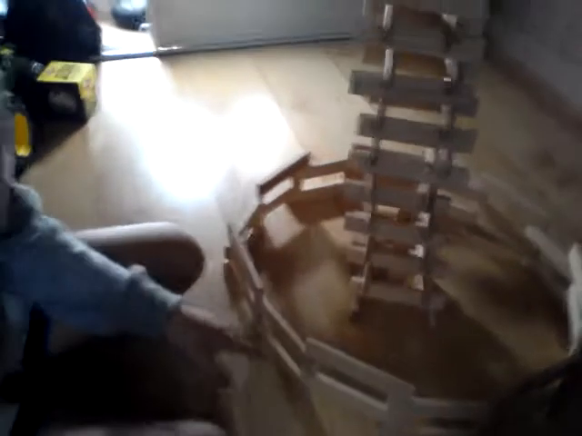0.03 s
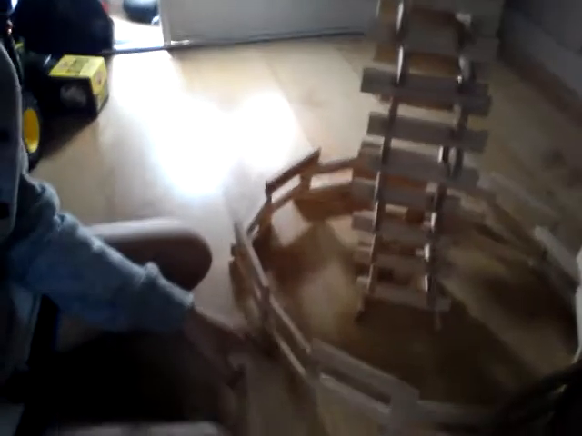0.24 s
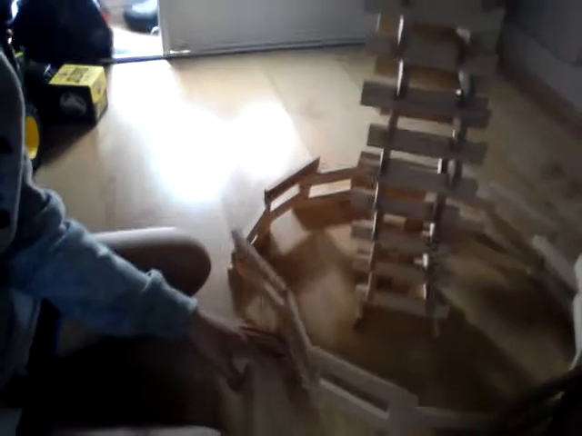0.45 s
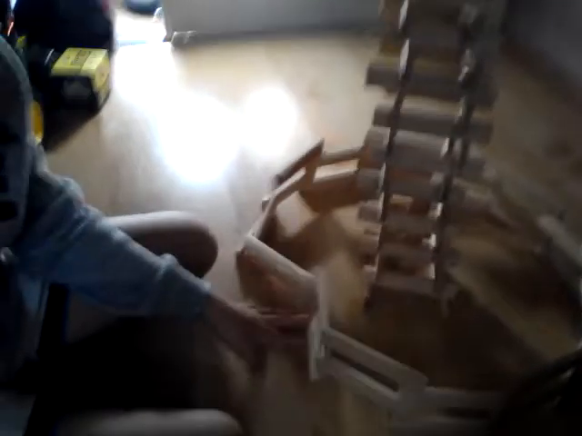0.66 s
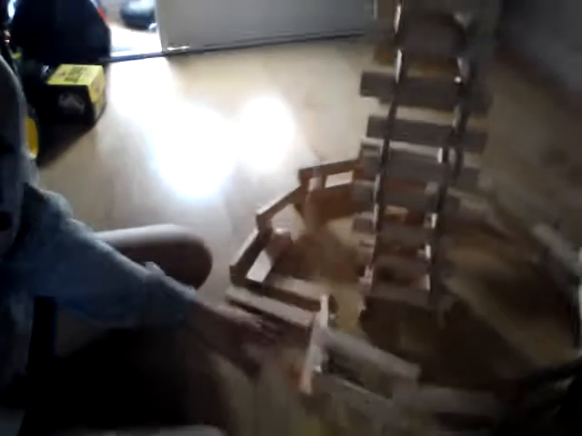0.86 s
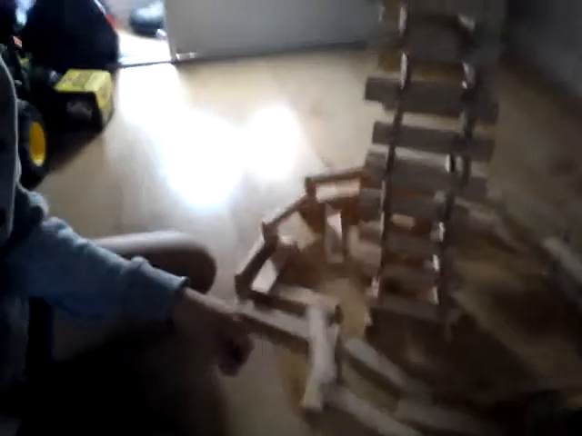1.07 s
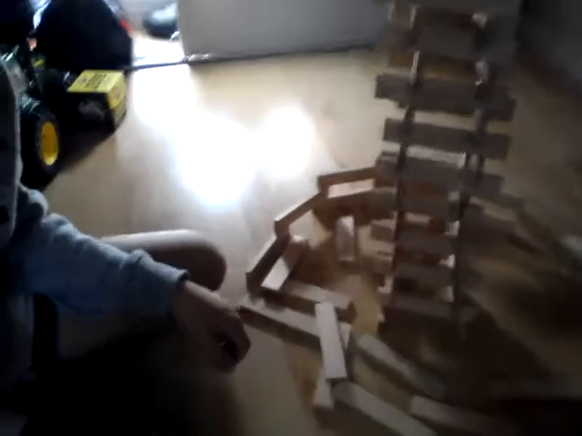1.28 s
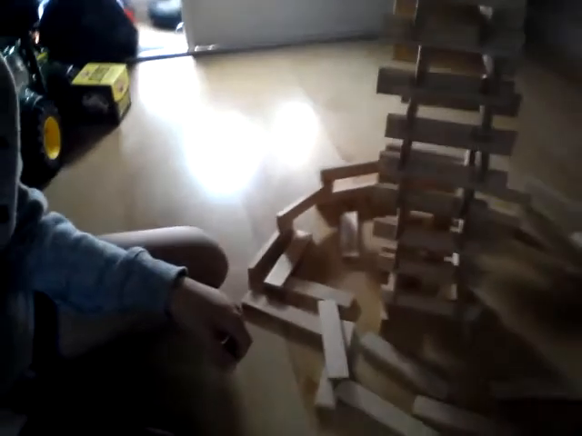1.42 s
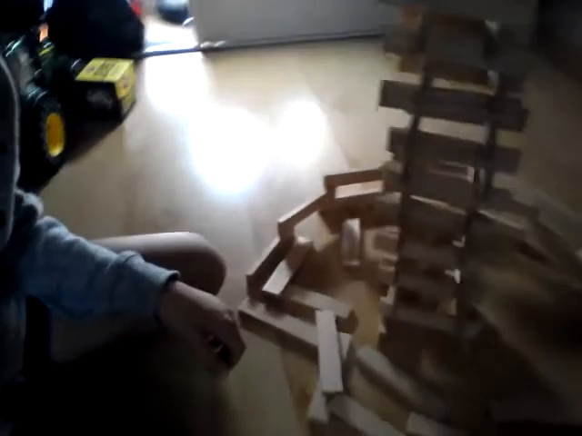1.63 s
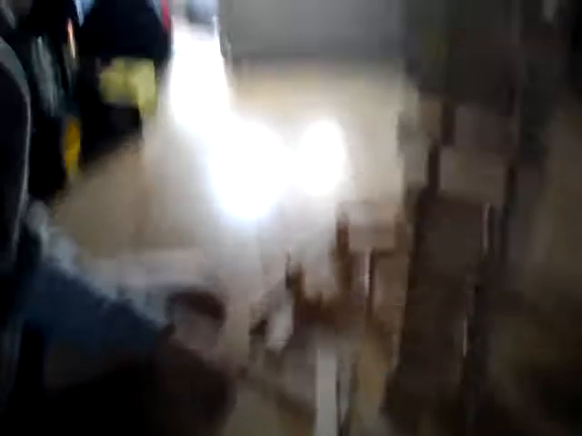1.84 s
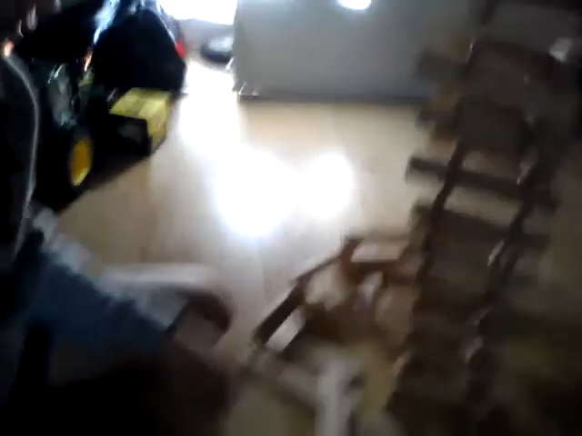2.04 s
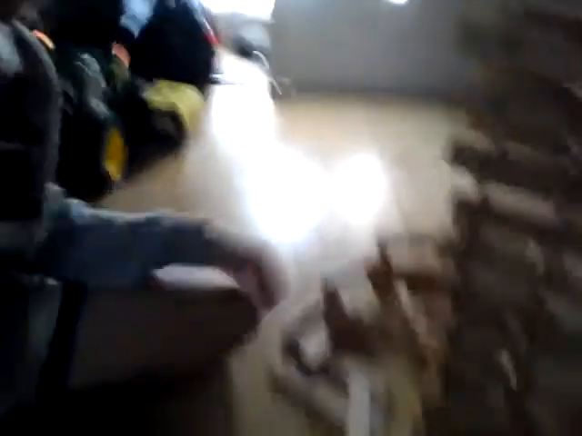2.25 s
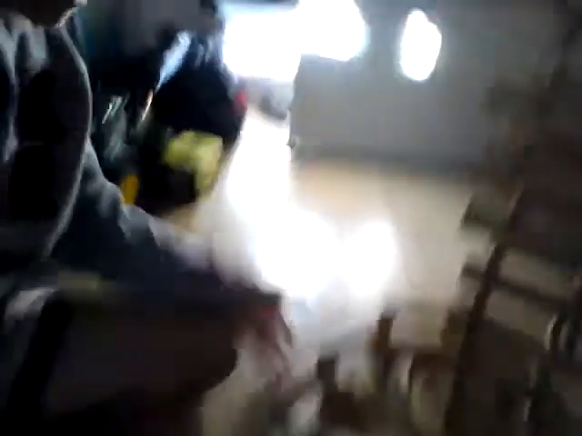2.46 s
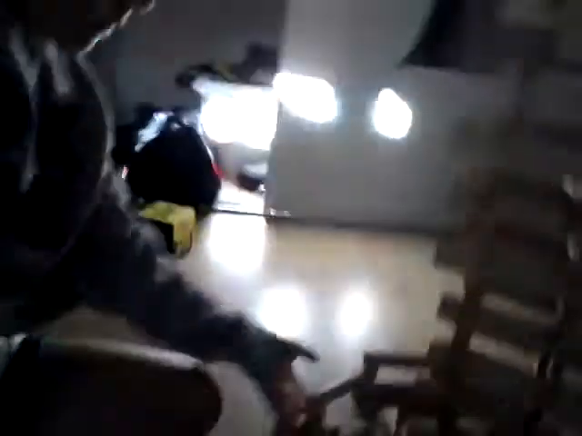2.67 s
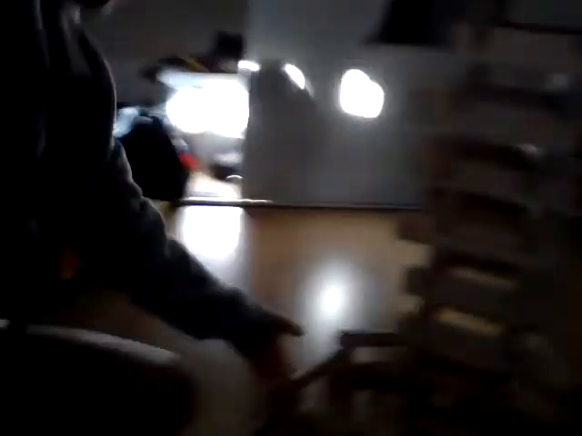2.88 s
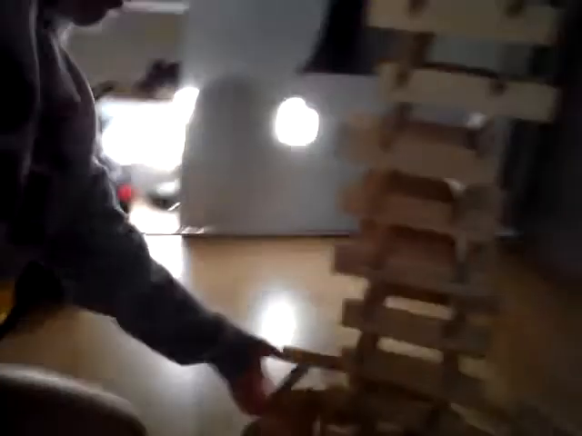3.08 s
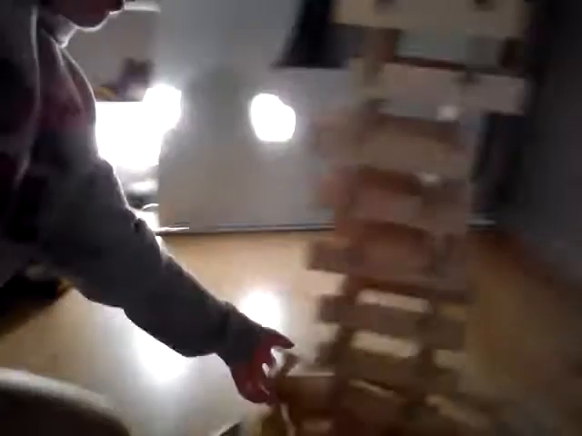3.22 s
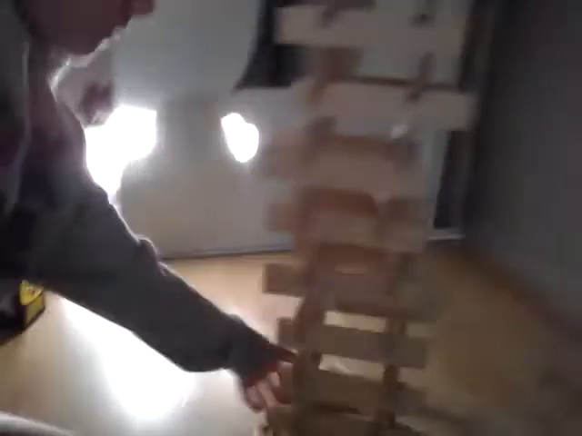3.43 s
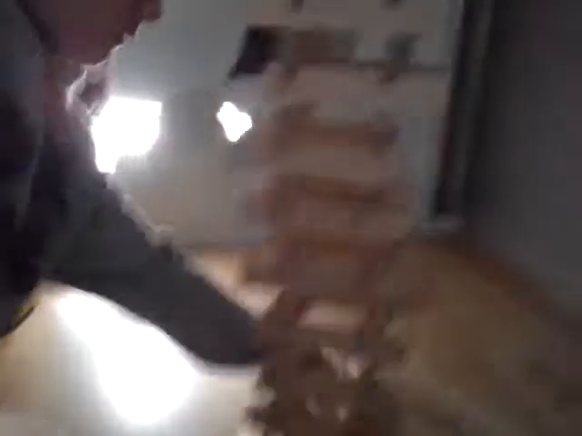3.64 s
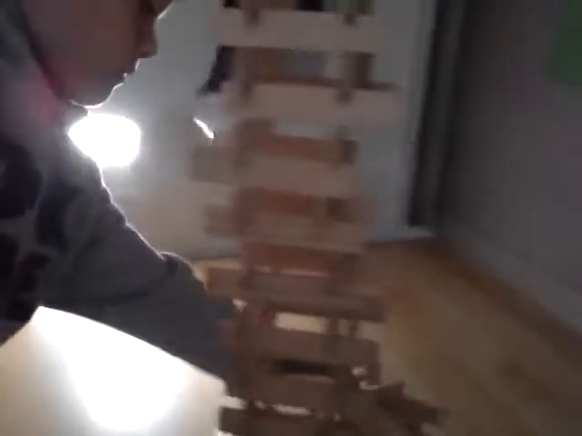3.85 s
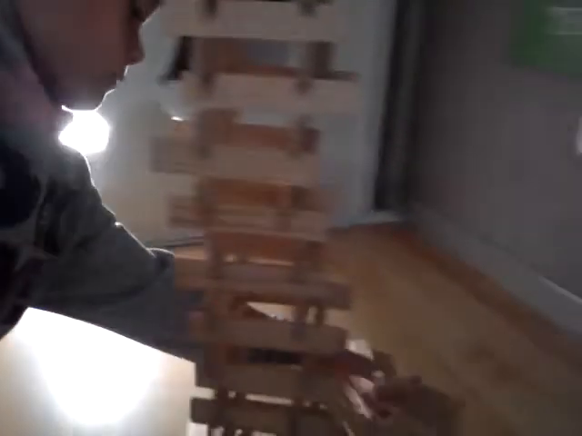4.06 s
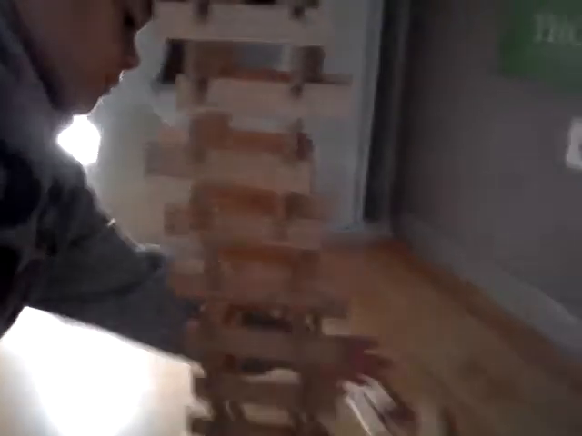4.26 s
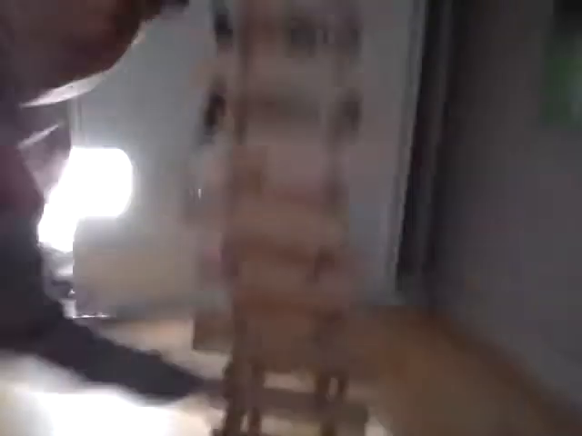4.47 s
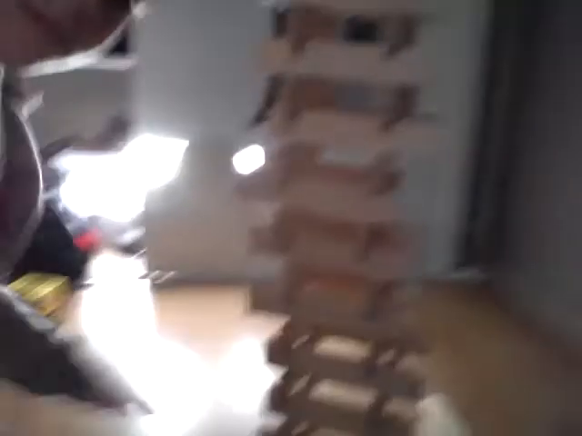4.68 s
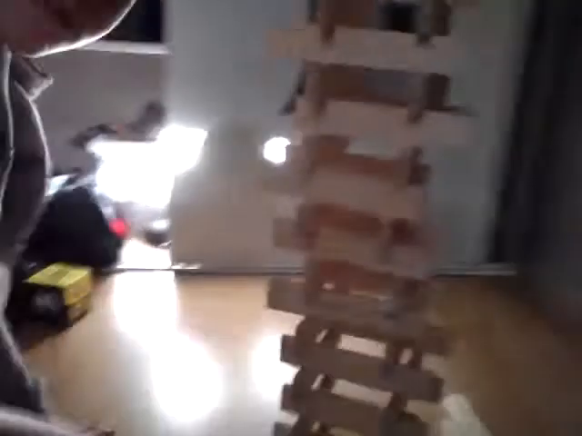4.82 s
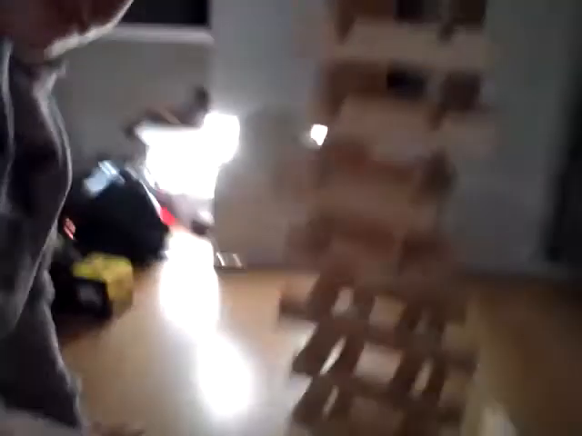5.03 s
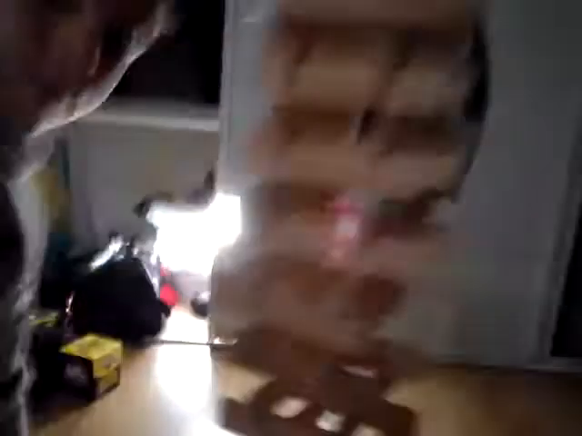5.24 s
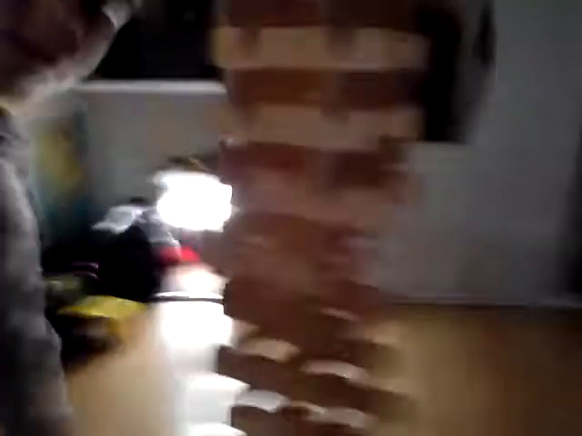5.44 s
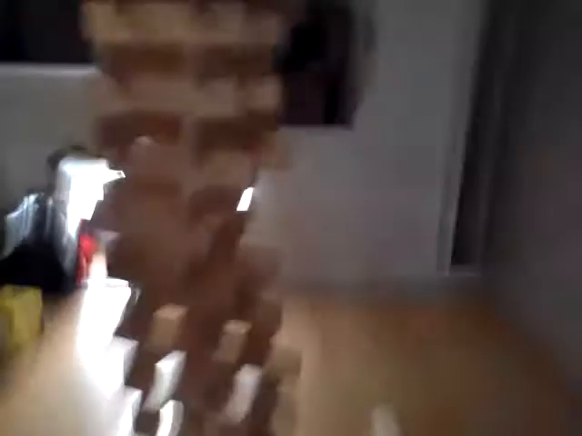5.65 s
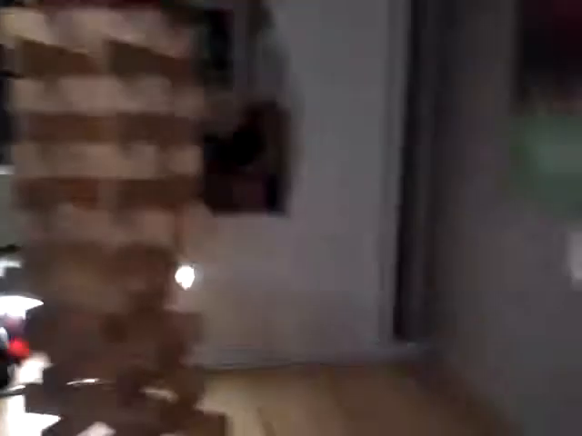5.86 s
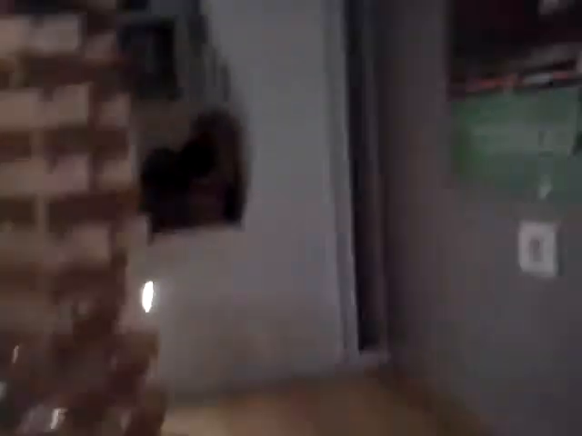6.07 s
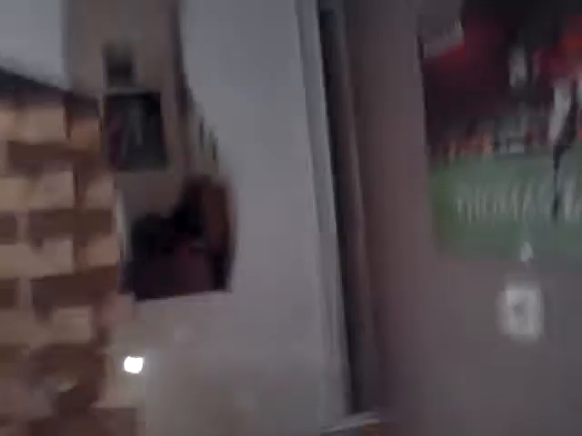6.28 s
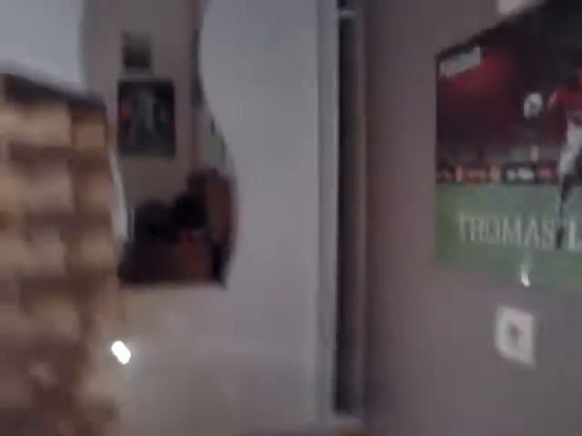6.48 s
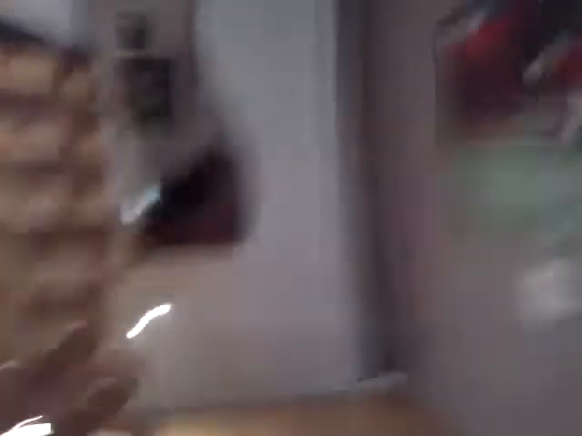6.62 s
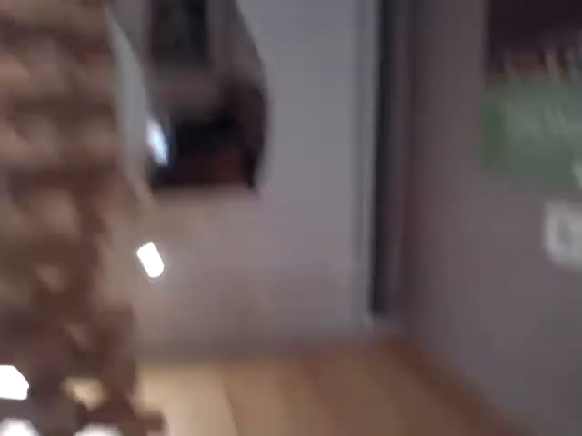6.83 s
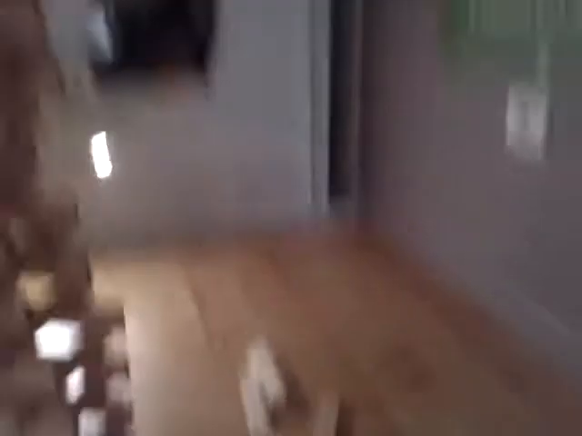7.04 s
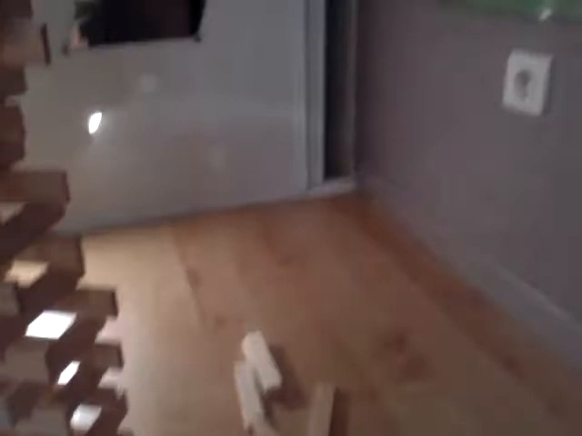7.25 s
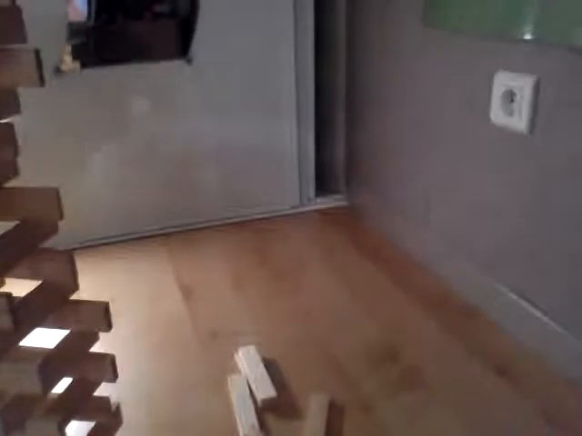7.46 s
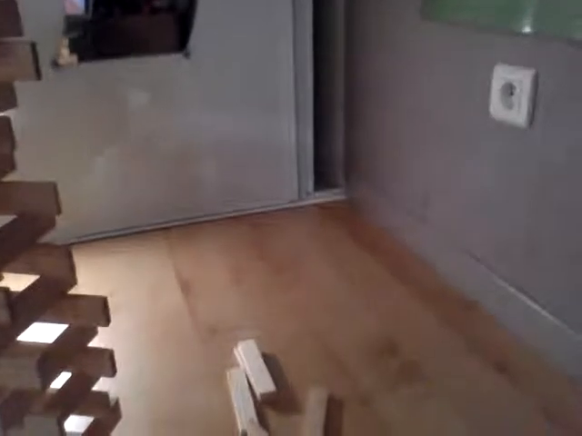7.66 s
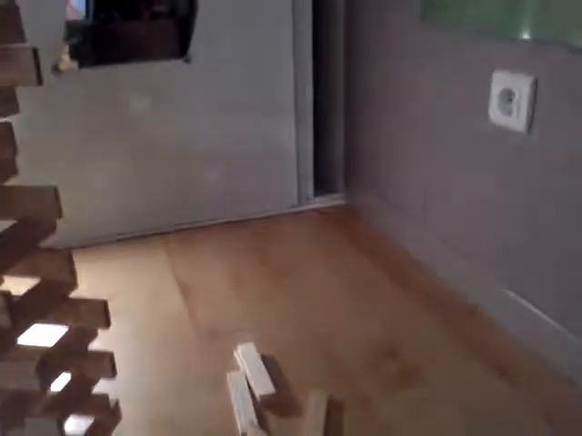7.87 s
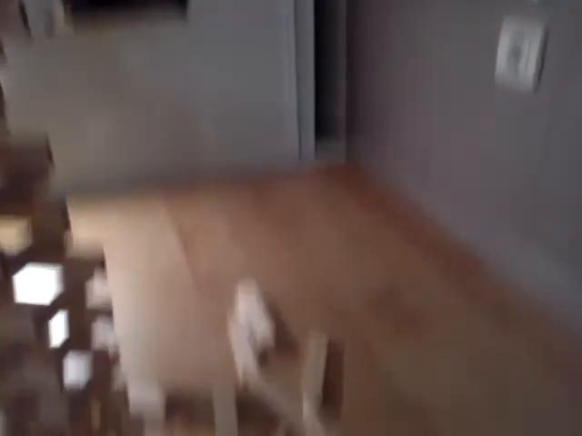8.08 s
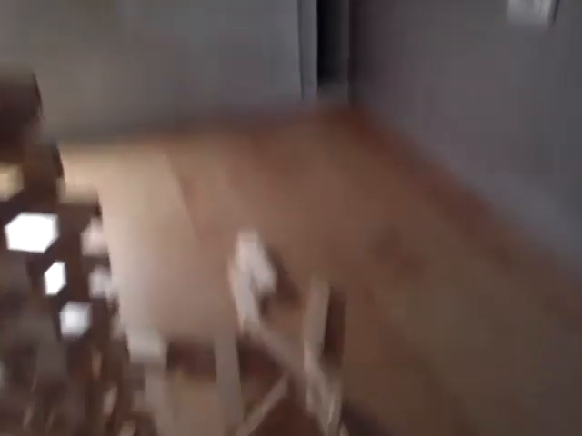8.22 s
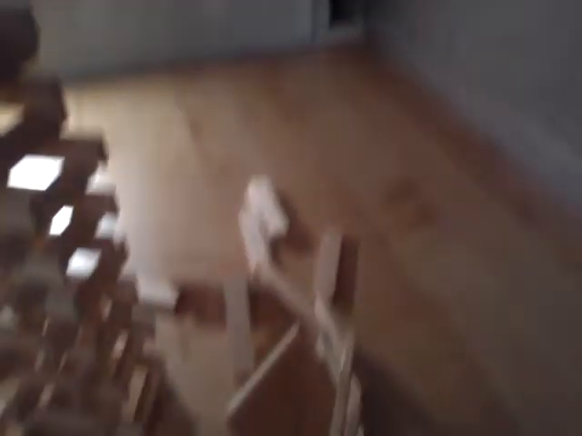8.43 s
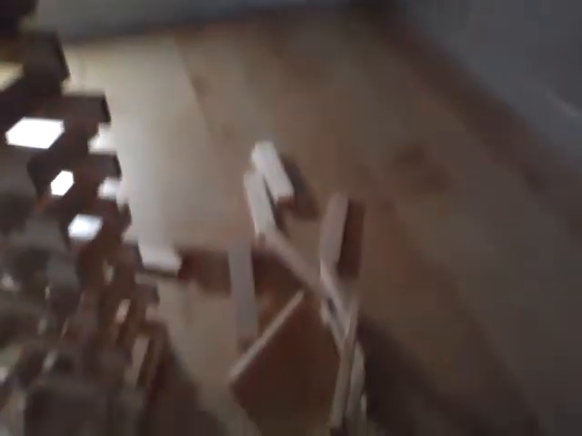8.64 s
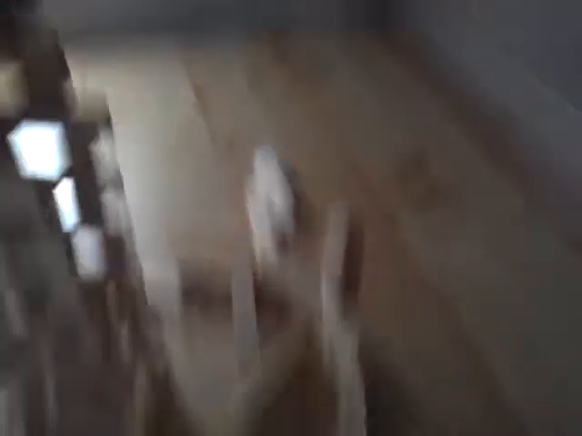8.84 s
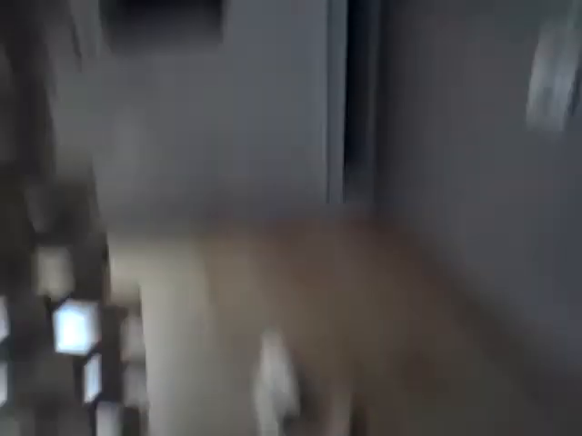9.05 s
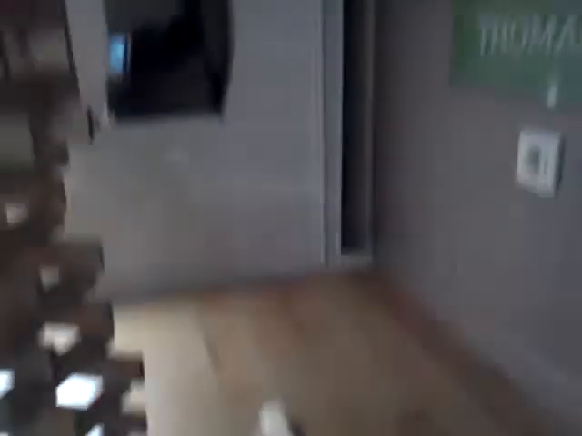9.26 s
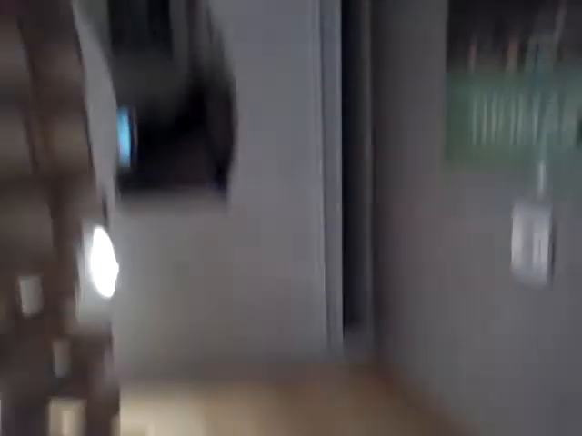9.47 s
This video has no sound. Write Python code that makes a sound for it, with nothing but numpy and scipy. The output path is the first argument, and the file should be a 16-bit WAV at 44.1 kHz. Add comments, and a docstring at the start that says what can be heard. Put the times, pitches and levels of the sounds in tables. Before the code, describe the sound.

Small wooden planks tumble onto a wooden floor with a bright, sharp clatter in a small, hard-walled room. Sleeves rustle faintly, one plank clacks, and a second, longer burst of clatter follows. Then a hand shifts on the phone holding the microphone: dry rubbing, ticks and dull thumps, very loud for a moment, before dropping to lighter bumps and scuffs.

```python
"""Small wooden planks tumble on a wooden floor in two bursts of clatter, in a small hard-walled room.
Each contact cracks, rings a plank and knocks the floorboard. Sleeves rustle; later a hand shifts on
the phone that holds the microphone: ticks, thumps and rubbing on its case.
One microphone with a strong presence peak, limited and clipped at full scale."""
import sys
import numpy as np
from scipy import signal
from scipy.fft import rfft, irfft, next_fast_len
from scipy.io import wavfile
from scipy.ndimage import minimum_filter1d, map_coordinates

SR = 44100
rng = np.random.default_rng(int(sys.argv[2]) if len(sys.argv) > 2 else 0)


def master(y):
    """Save y as 16-bit WAV."""
    cut = np.clip(np.atleast_2d(y).T, -1, 1)
    pcm = np.round(cut * 32767)  # scale
    wavfile.write(sys.argv[1], SR, pcm.astype(np.int16))


N = 419082
TIME_S = np.arange(N) / SR


def amp(db):
    return 10 ** (np.asarray(db) / 20)


def log_interp(points, hz):
    knot_hz, values = np.transpose(points)
    return np.interp(np.log(hz + 1), np.log(knot_hz + 1), values)


def wobble(rate_hz):
    """Smooth random curve."""
    return map_coordinates(rng.standard_normal(int(N * rate_hz / SR) + 4), [TIME_S * rate_hz])


def filtered(x, response):
    size = next_fast_len(N + SR // 2)
    return irfft(rfft(x, size) * response(np.fft.rfftfreq(size, 1 / SR)), size)[..., :N]


def noise(spectrum):
    """Coloured noise, rms 1."""
    x = filtered(rng.standard_normal(N), lambda hz: amp(log_interp(spectrum, hz)))
    return x / np.sqrt(np.mean(x ** 2))


def place(times_s, sounds):
    """Sum of rows, each starting at its time."""
    index = np.round(times_s * SR).astype(int)[:, None] + np.arange(sounds.shape[1])
    return np.bincount(index.ravel(), sounds.ravel(), N + SR)[:N]


def ring(hz, db, t60_s, attack_s, size):
    """One damped sine per row."""
    t = np.arange(size) / SR
    hz, db, t60_s = (np.reshape(v, (-1, 1)) for v in (hz, db, t60_s))
    return amp(db - 60 * t / t60_s) * np.sin(2 * np.pi * hz * t) * (1 - np.exp(-t / attack_s))


def burst(db, t60_s, size):
    """One damped noise burst per row."""
    t = np.arange(size) / SR
    return amp(db[:, None] - 60 * t / t60_s) * rng.standard_normal((len(db), size))


# Background spectrum: (frequency [Hz], relative density [dB])
BACKGROUND_SPECTRUM = [(18, -30.5), (30, -22.5), (62, -45), (200, -12.5), (273, -26), (373, -7.5),
                       (403, -15), (7010, -22.5), (13800, -16.5), (14900, -23)]


def background(rms_db=-69.5):
    """Steady room and preamp noise."""
    return amp(rms_db) * noise(BACKGROUND_SPECTRUM)


# Noise swells, mostly cloth and skin strokes; the one at 4.45 s is a soft hiss as the clatter dies away: #
# (full-pressure time [s], rise [s], hold [s], fade [s], hiss [dB], rumble [dB])
NOISE_SWELLS = [(0.144, 0.022, 0.092, .1, -62, -67.5), (0.386, 0.15, .04, .25, -66.5, -71.5),
                (0.559, 0.12, 0.012, .02, -62, -62), (1.846, 0.019, 0.0017, .07, -57.5, -64.5),
                (2.06, 0.0049, 0.038, .2, -60, -74.5), (2.152, .03, .02, .2, -53, -64),
                (2.246, 0.025, .002, .12, -49.5, -68), (2.41, .25, 0.018, .25, -51, -63.5),
                (2.587, 0.053, 0.0026, .02, -50, -45.5), (2.759, 0.026, .002, .15, -47.5, -58),
                (2.886, 0.11, 0.13, .35, -49.5, -50), (3.149, 0.15, 0.047, .02, -48, -51.5),
                (4.45, .01, 0.11, .1, -51.5, -75), (4.737, 0.017, .02, .2, -62, -66.5),
                (4.813, 0.022, .002, .05, -49, -65), (4.977, .017, 0.18, .1, -56, -74),
                (5.08, .02, 0.12, .16, -52, -65), (5.327, 0.03, .002, .2, -51, -53.5),
                (5.413, 0.073, 0.00203, .15, -50.5, -52), (5.5, 0.052, 0.058, .02, -57, -68),
                (5.577, .02, .01, 0.17, -50, -64), (5.718, 0.01, 0.0022, .09, -52.5, -62),
                (5.845, 0.03, 0.0019, .03, -104, -38.5), (5.878, 0.017, .01, 0.086, -53, -44.5),
                (5.908, .015, .17, .06, -46, -54.5), (6.196, 0.15, .002, .03, -38.5, -45.5),
                (6.217, 0.011, 0.0028, .1, -60.5, -58.5), (6.438, 0.039, .002, .04, -46.5, -59),
                (6.464, .03, .07, 0.038, -48, -71), (6.61, 0.03, 0.0018, .04, -32.5, -19),
                (6.644, .02, .09, 0.14, -35, -38.5), (6.803, .03, 0.031, .1, -43, -49.5),
                (6.916, 0.24, .065, 0.057, -37.5, -42.5), (7.05, 0.035, .07, .1, -51.5, -67),
                (7.19, .02, .11, .06, -55, -65), (7.388, 0.021, .002, .12, -50.5, -60),
                (7.572, 0.069, .002, .06, -57, -60.5), (7.844, .012, .002, .13, -73.5, -68.5),
                (8.108, 0.059, .002, .03, -52.5, -47.5), (8.154, .03, 0.0014, .03, -58, -66),
                (8.247, 0.029, 0.045, .08, -48.5, -63), (8.365, 0.39, .09, .05, -46.5, -62),
                (8.555, .01, .002, .03, -59, -66), (8.7, 0.015, .002, .05, -56, -48),
                (8.736, .02, 0.084, .03, -64.5, -71.5), (8.891, 0.091, .002, .25, -53.5, -60),
                (9.003, 0.023, .002, .03, -56.5, -63), (9.079, 0.09, .05, 0.055, -51, -51.5),
                (9.223, 0.037, 0.089, 0.087, -60, -74.5), (9.392, 0.08, .06, .05, -52.5, -59.5),
                (9.488, 0.065, .01, .05, -45.5, -41)]


def stroke_levels(swing_db=20, touch_db=-9.5, touch_s=0.012):
    """Hiss and rumble in dB. Each swell touches, rises, holds and fades; the loudest one wins."""
    out_db = np.full((2, N), -150.)
    for full_s, rise_s, hold_s, fade_s, *levels_db in NOISE_SWELLS:
        contact_s = full_s + rise_s * touch_db / swing_db
        ramps = np.maximum((full_s - TIME_S) / rise_s, (TIME_S - full_s - hold_s) / fade_s).clip(0)
        onset = (contact_s - TIME_S).clip(0) / touch_s
        out_db = np.maximum(out_db, np.array(levels_db)[:, None] - swing_db * (ramps + onset))
    return out_db


# Friction spectra of sleeves, skin on the case and firm rubbing by the microphone port:
# (frequency [Hz], relative density [dB])
SLEEVE_HISS = [(410, -46.5), (700, -15), (1080, -20), (2050, -14), (2300, -17), (2420, -12.5),
               (2680, -14.5), (3990, -8.5), (14900, -29.5)]
SLEEVE_RUMBLE = [(47, -67.5), (80, -55.5), (284, -13.5), (352, -12), (579, -4), (833, -14), (2000, -25),
                 (2600, -42.5), (4400, -120)]
CASE_HISS = [(290, -34.5), (500, -8.5), (664, -19), (846, -13), (2250, -11), (4030, -3), (4580, -5.5),
             (12700, -23), (14900, -28.5)]
CASE_RUMBLE = [(35, -54), (60, -31), (276, -7.5), (344, -19.5), (398, -11.5), (550, -17), (2000, -28.5),
               (2600, -63.5), (4400, -120)]
PORT_RASP = [(2900, -38.5), (3700, -8.5), (4250, -2), (4800, -10), (5800, -39.5)]


def rubbing(sleeve_to_case_s=(5.4, 5.87), firm_db=-44):
    """Uneven friction: hiss flickers, rumble comes in lumps, firm strokes add a narrow rasp."""
    hiss_db, rumble_db = stroke_levels()
    on_case = np.interp(TIME_S, sleeve_to_case_s, [0, 1])
    hiss = (1 - on_case) * noise(SLEEVE_HISS) + on_case * noise(CASE_HISS)
    flicker_db = (0.2 + 1.3 * on_case) * wobble(60) + 1.5 * wobble(410)
    hiss *= amp(hiss_db - 4.5 + flicker_db)
    pressure_db = np.clip(0.89 * (hiss_db - firm_db), -22, 0)
    rasp = noise(PORT_RASP) * amp(hiss_db + pressure_db - 1.5 + 2.5 * wobble(90))
    rumble = (1 - on_case) * noise(SLEEVE_RUMBLE) + on_case * noise(CASE_RUMBLE)
    return hiss + rasp + rumble * amp(rumble_db + 1.1 * wobble(40))


# Floorboard modes: (frequency [Hz], level re knock [dB], t60 [s])
FLOOR_MODES = [(480, 1.3, 0.075), (584, 8.5, .05), (754, 13, 0.016), (995.5, 1.6, .02), (1318, 2.7, 0.024)]


def contacts(time_s, db, bend_hz, bend_db, upper_hz, upper_db, knock_db, twist_db, spread_db, size):
    """Each contact cracks, rings three plank modes and knocks the floorboard; mode levels are re db."""
    scatter = rng.standard_normal((14, len(time_s)))
    twist_hz = 4150 * (1 + 0.16 * scatter[12])
    sound = burst(db, t60_s=0.011, size=size)
    sound += ring(bend_hz, db + bend_db + spread_db * scatter[0], 0.06, 0.0012, size)
    sound += ring(upper_hz, db + upper_db + spread_db * scatter[1], 0.03, 0.00066, size)
    sound += ring(twist_hz, db + twist_db + spread_db * scatter[13], 0.011, 0.00012, size)
    for k, (mode_hz, mode_db, t60_s) in enumerate(FLOOR_MODES):
        spot_hz = mode_hz * (1 + 0.088 * scatter[2 + k])  # varies with the spot struck
        sound += ring(spot_hz, db + knock_db + mode_db + 2.2 * scatter[7 + k], t60_s, 0.00038, size)
    return place(time_s, sound)


# Plank impacts, and at 4.81 s a faint tick of the hand voiced the same way: # (time [s], crack level [dB],
# bending mode [Hz], bending re crack [dB], # upper mode [Hz], upper re crack [dB], floor knock re crack [dB])
PLANK_BLOWS = [(0.5657, -8, 2608, -9, 6450, -22, -10.5), (0.6222, 9, 2370, -21.5, 5273, -15, -23),
               (0.654, -16, 2401, -11.5, 4707, -11.5, -17.5), (0.6968, -5, 2571, -13, 6270, -5.5, -21),
               (0.7557, -5.5, 2270, -15.5, 6725, -4.5, -17), (0.8116, -8, 2333, -21.5, 6075, -8.5, -13.5),
               (0.846, -4, 2230, -9.5, 5647, -9.5, -15), (0.852, -1.5, 2327, -17, 5143, -8.5, -24),
               (0.8916, -3.5, 2194, -13.5, 4940, -12, -18), (0.9057, -7.5, 2428, -21.5, 5840, -16.5, -17.5),
               (0.9209, -8.5, 2212, -12.5, 5644, -10, -15.5), (0.9537, -7.5, 2230, -25, 5525, -5, -17.5),
               (0.9791, -6.5, 2845, -22.5, 5495, -8, -20), (1.051, 1.5, 2186, -18, 6005, -11.5, -25.5),
               (1.071, -9, 2320, -21.5, 6065, -16.5, -18.5), (1.1676, -4, 2304, -23, 4995, -19, -30.5),
               (2.6, -10.5, 2618, 1.5, 6290, -16, -27), (3.2056, -4, 2029, -5, 5248, -1.5, -15.5),
               (3.2558, -12, 2021, -5, 5125, -7.5, -0.5), (3.3505, -12, 1962, -23.5, 5276, -10.5, -15),
               (3.3619, -5, 2750, -25.5, 5036, -8.5, -17.5), (3.3806, -5, 2606, -14, 4920, -14.5, -20.5),
               (3.423, -6.5, 1969, -16, 5250, -24.5, -23), (3.4394, 4, 2930, -20, 4503, -16, -25),
               (3.464, -6.5, 2090, -18.5, 5237, -19, -16), (3.4983, -6.5, 1938, -14, 5170, -10, -12),
               (3.5281, -5.5, 1943, -9.5, 5226, -14.5, -16.5), (3.578, 0, 2666, -21, 5196, -15.5, -24),
               (3.7, -2, 2918, -21.5, 5210, -10.5, -24.5), (3.7825, -9.5, 2820, -15.5, 5200, -17, -17),
               (3.8153, -14, 2678, -4, 4810, -14, -7.5), (3.8398, -4, 1940, -15, 5110, -17.5, -12.5),
               (3.8543, -4, 2620, -8, 4990, -18, -17.5), (3.9648, 1, 2653, -15, 5400, -12.5, -23),
               (4.0544, -2.5, 2786, -24.5, 5500, -17, -31), (4.0818, -7, 2450, -17, 4916, -9.5, -26),
               (4.106, -3.5, 2725, -9, 7037, -12.5, -34.5), (4.149, 3, 2815, -22, 5484, -2.5, -28.5),
               (4.21, -7.5, 2753, -21.5, 5372, -6.5, -17.5), (4.2728, -2, 2745, -37.5, 4822, -14, -23),
               (4.3295, -8.5, 2860, -32, 4860, -26.5, -23), (4.8124, -58, 2870, -27.5, 4980, -12.5, -6)]


def blows():
    """Single planks land or meet; the faint last one is a tick of the hand."""
    return contacts(*np.transpose(PLANK_BLOWS), twist_db=-15.5, spread_db=2.5, size=2600)


# Clatter envelopes, one list per stretch: (time [s], level [dB])
CLATTER_ENVELOPES = [
    [(0.57, -24), (0.614, -32.5), (0.64, -33.5), (0.664, -21.5), (0.695, -24.5)],
    [(0.7, -23.5), (0.76, -19), (0.84, -29.5)],
    [(0.85, -21.5), (0.902, -23.5), (0.944, -28.5)],
    [(0.955, -20.5), (1.03, -18.5), (1.055, -28.5), (1.075, -19), (1.12, -18), (1.194, -27.5),
     (1.24, -37.5)],
    [(3.21, -27.5), (3.24, -26.5), (3.256, -30.5), (3.35, -47.5)],
    [(3.36, -34.5), (3.4, -21.5), (3.42, -24.5), (3.444, -16), (3.454, -35.5), (3.49, -31.5), (3.52, -20),
     (3.6, -29.5), (3.69, -45.5)],
    [(3.705, -29), (3.721, -20.5), (3.799, -37), (3.879, -24.5), (3.955, -40)],
    [(3.97, -18), (4.02, -25.5), (4.05, -40), (4.07, -36), (4.085, -19.5), (4.15, -29), (4.18, -20.5),
     (4.22, -27.5), (4.338, -43), (4.37, -62.5)],
]
# Typical plank per stretch: (bending mode [Hz], upper mode [Hz], upper re crack [dB], floor knock [dB])
CLATTER_PLANKS = [(2200, 18000, -12.5, -16), (2470, 6600, 2.5, -19), (2195, 5700, -7.5, -15.5),
                  (2293, 7000, -4.5, -23), (2120, 5700, -7, -7), (1945, 5250, -16.5, -17.5),
                  (2630, 2300, -13, -15), (2740, 5450, -8, -21.5)]


def tumble(count=900, typical_db=-26.5):
    """Many small plank contacts at random times, a few harder than the rest."""
    envelope_db = np.full(N, -70.)
    for points in CLATTER_ENVELOPES:
        knot_s, knot_db = np.transpose(points)
        inside = (TIME_S >= knot_s[0]) & (TIME_S <= knot_s[-1])
        envelope_db[inside] = np.interp(TIME_S[inside], knot_s, knot_db)
    start_s, end_s = np.transpose([(points[0][0], points[-1][0]) for points in CLATTER_ENVELOPES])
    elapsed_s = np.cumsum(end_s - start_s)
    when, force, bend_draw, upper_draw = rng.random((count, 4)).T
    offset_s = when * elapsed_s[-1]
    stretch = np.searchsorted(elapsed_s, offset_s)
    time_s = end_s[stretch] - (elapsed_s[stretch] - offset_s)
    db = envelope_db[np.round(time_s * SR).astype(int)]
    bend_hz, upper_hz, upper_db, knock_db = np.array(CLATTER_PLANKS)[stretch].T
    knock_db -= 0.25 * (db - typical_db)  # the floor rumbles on through lulls
    force_db = -2.2 * np.log(force + 0.1)
    bend_hz *= np.exp(0.05 * (bend_draw - 0.5))  # planks vary in stiffness
    upper_hz *= np.exp(0.15 * (upper_draw - 0.5))
    return contacts(time_s, db + force_db, bend_hz, -16.5, upper_hz, upper_db, knock_db,
                    twist_db=-1, spread_db=3.5, size=1300)


# Room decay: (frequency [Hz], t60 [s])
ROOM_DECAY = [(200, 0.72), (600, 0.36), (1500, 0.4), (2600, 0.38), (4000, 0.35), (10000, .36)]


def room(x, wet_db, until_s=5):
    """Hard walls add a tail with frequency-dependent decay, drawn anew for each short block."""
    wet, block = np.zeros(N + 2 * SR), SR // 8
    for start in range(0, until_s * SR, block):
        hz, t, spectra = signal.stft(rng.standard_normal(SR * 3 // 4), SR, nperseg=256)
        decay = amp(-60 * t / log_interp(ROOM_DECAY, hz)[:, None])
        tail = signal.istft(spectra * decay, SR, nperseg=256)[1]
        tail *= 1 - np.exp(-np.arange(len(tail)) / SR / 0.00044)
        reverb = signal.fftconvolve(x[start:start + block], tail / np.linalg.norm(tail))
        wet[start:start + len(reverb)] += reverb
    return x + amp(wet_db) * wet[:N]


def plank_radiation(x):
    """Small planks radiate no bass; their cracks are soft at the top."""
    return filtered(x, lambda hz: (1j * hz / (1j * hz + 230)) ** 7 / (1 + 1j * hz / 9000) ** 2)


def case_band(x, makeup_db=12.5):
    """The case passes a dull low-mid band."""
    return amp(makeup_db) * filtered(x, lambda hz: 1j * hz / (1j * hz + 300) / (1 + 1j * hz / 1300) ** 2)


# Case ticks: (time [s], peak level [dB], dull part re peak [dB])
CASE_TICKS = [(1.8089, -28.5, -29), (2.0715, -44, -23.5), (2.2493, -37, -18), (2.4, -43.5, 3),
              (2.8809, -29.5, -28), (5.3283, -38.5, -9.5), (5.4124, -47.5, 16), (5.5548, -11, -28.5),
              (5.7194, -37, 4), (5.8074, -6, -7), (5.8162, -4, -2.5), (5.8696, -23, -17),
              (5.9653, -23.5, -31), (6.4363, -23, -35.5), (6.567, 1, -9), (6.5784, 4.5, 1.5),
              (6.6483, -16, 1), (6.7092, -13, -3), (6.7411, -20.5, -18), (7.0454, -36.5, -26),
              (7.0674, -33, -23), (7.0853, -32.5, -31.5), (7.0978, -36, -27), (7.1172, -32, -16),
              (7.1964, -38.5, -16.5), (7.243, -38, -25), (7.3874, -32, -20), (7.5662, -46, -10.5),
              (8.1044, -40.5, -10), (8.2192, -30.5, -32.5), (8.2744, -45.5, -27), (8.4233, -20.5, -7),
              (8.539, -30, -25), (8.6467, -25.5, -28.5), (8.7216, -27, -26), (8.9905, -34.5, -27)]


def ticks(crest_db=11.5):
    """The case ticks under the hand: dry bursts, bright plus dull, with a faint short wake."""
    time_s, peak_db, dull_db = np.transpose(CASE_TICKS)
    t = np.arange(3000) / SR
    decay = amp(-60 * t / 0.013) + amp(-18.5 - 60 * t / 0.079)
    envelope = amp(peak_db - crest_db)[:, None] * decay
    bright, dull = envelope * rng.standard_normal((2, *envelope.shape))
    return place(time_s, bright) + case_band(place(time_s, amp(dull_db)[:, None] * dull))


# Hand on the case, and a plank nudged on the floor:
# (time [s], level [dB], main mode [Hz], t60 [s], relative noise bite [dB])
THUMPS = [(2.561, -44, 572.4, 0.047, -0.5), (5.326, -43, 240, 0.078, -12), (5.39, -42.5, 140, 0.11, -20),
          (5.554, -30.5, 372, 0.032, 0), (5.81, -25, 531, 0.063, -3), (5.867, -33, 456, 0.097, -12),
          (6.085, -32, 150.6, 0.2, -5.5), (6.133, -28.5, 149.4, 0.1, -3.5), (6.194, -32.5, 196, 0.091, -3),
          (6.433, -42, 325, 0.025, 1), (6.578, -10, 273, 0.073, -2.5), (6.614, -11, 343, 0.071, -7),
          (6.669, -23.5, 398, 0.038, -23.5), (7.414, -23.5, 207, 0.081, -22),
          (7.569, -26.5, 175.5, 0.057, -29.5), (7.589, -46, 236, 0.076, -28.5), (7.69, -63, 300, .03, -10),
          (7.854, -52, 477, 0.051, -13), (8.075, -39.5, 165, 0.063, -15.5), (8.1, -27.5, 170, 0.11, -29.5),
          (8.222, -30, 167, 0.099, -22), (8.705, -34.5, 476, 0.041, 1.5), (8.889, -37, 443, 0.038, -9.5),
          (8.91, -32.5, 203, 0.061, -27.5), (9.04, -38, 264, 0.058, -15), (9.388, -27, 168.6, 0.082, -35),
          (9.451, -43.5, 462, 0.3, -11.5), (9.468, -25.5, 208, 0.06, -15)]


def thumps(size=6000):
    """Each push rings a few rough low modes under a dull bite of noise."""
    time_s, db, hz, t60_s, bite_db = np.transpose(THUMPS)
    scatter = rng.standard_normal((8, len(time_s)))
    modes = ring(hz, db + 2, t60_s, 0.0013, size)
    for k, (ratio, relative_db) in enumerate([(0.8, -6.5), (1.4, -5), (1.9, -7), (2.7, -8)]):
        mode_hz = ratio * hz * (1 + 0.1 * scatter[k])
        mode_db = db + relative_db + 2.2 * scatter[4 + k]
        modes += ring(mode_hz, mode_db, 1.37 * t60_s / ratio ** 0.86, 0.00049, size)
    bite = burst(db + bite_db, t60_s=0.018, size=3000)
    return place(time_s, modes) + case_band(place(time_s, bite))


def microphone(x, port_hz=4200, width_hz=1300):
    """The port resonates; bass and top treble fall away."""
    def response(hz):
        presence = 1 + 5.27j * hz * width_hz / (port_hz ** 2 - hz ** 2 + 1j * hz * width_hz)
        return presence * (1j * hz / (1j * hz + 105)) ** 4 / (1 + 1j * hz / 7000) ** 3
    return filtered(x, response)


def limiter(x, threshold_db=-8, depth=2.4, attack_s=0.003, hold_s=0.009, release_s=0.008):
    """Gain over-ducks just after a loud onset, holds, then recovers."""
    pole = np.exp(-1 / (attack_s * SR))
    rms = np.sqrt(np.abs(signal.lfilter([1 - pole], [1, -pole], x * x)))
    gain = np.minimum(1, amp(threshold_db) / (rms + 1e-9)) ** depth
    width = int(hold_s * SR) // 2 * 2 + 1
    held = minimum_filter1d(gain, width, origin=width // 2)
    pole = np.exp(-1 / (release_s * SR))
    return x * signal.lfilter([1 - pole], [1, -pole], held, zi=[pole])[0]


def scene():
    """Planks in the room plus dry handling noise, the same in both channels."""
    planks = plank_radiation(room(blows() + tumble(), wet_db=-1.5))
    mono = microphone(planks + ticks() + thumps()) + rubbing() + background()
    return np.array([mono, mono])


def record(dry, top_hz=15000):
    """The limiter reacts late, so peaks saturate; then a band limit and a clip at full scale."""
    limited = np.array([limiter(channel) for channel in dry])
    saturated = limited / (1 + np.abs(limited / 1.1) ** 6) ** (1 / 6)
    return np.clip(filtered(saturated, lambda hz: hz < top_hz), -1, 1)


dry = scene()
out = record(dry)
master(out)
```